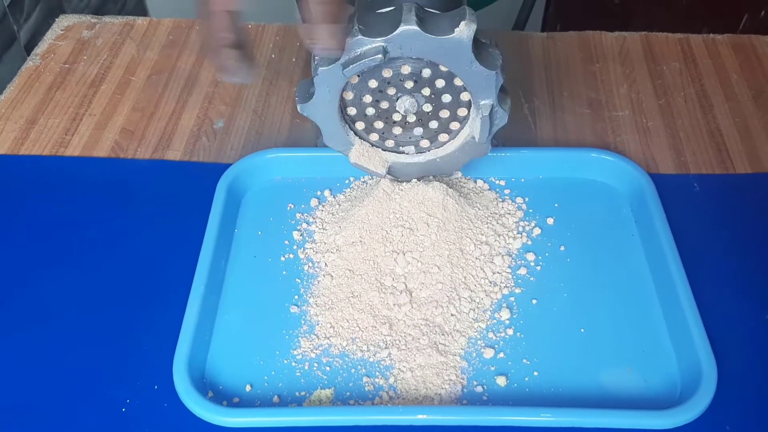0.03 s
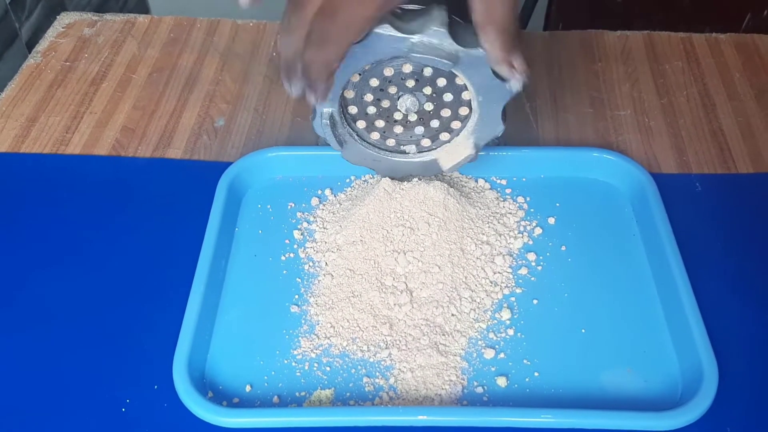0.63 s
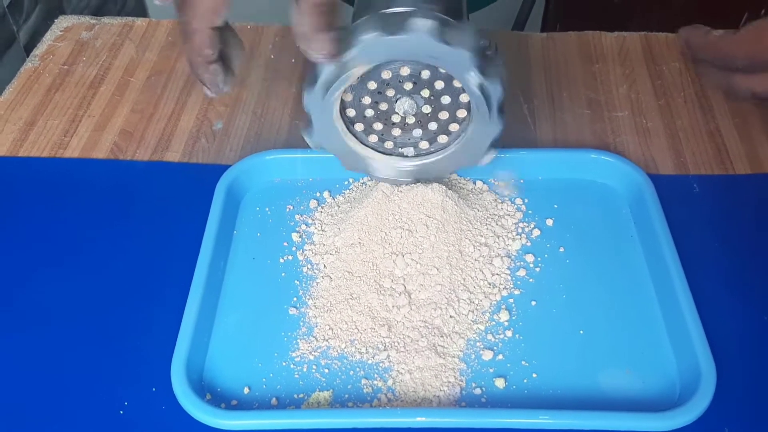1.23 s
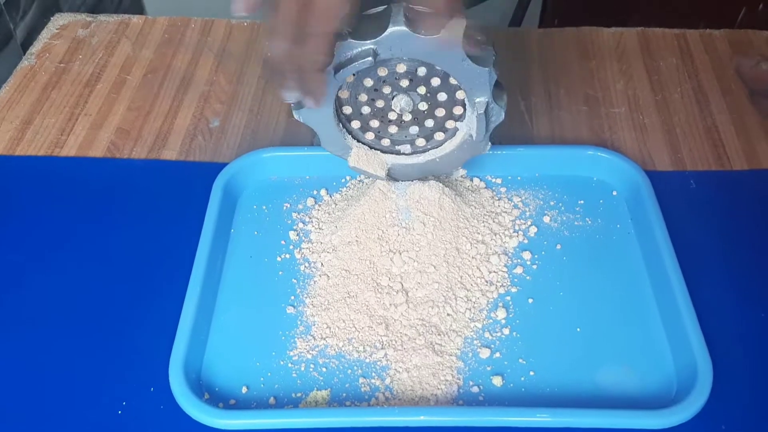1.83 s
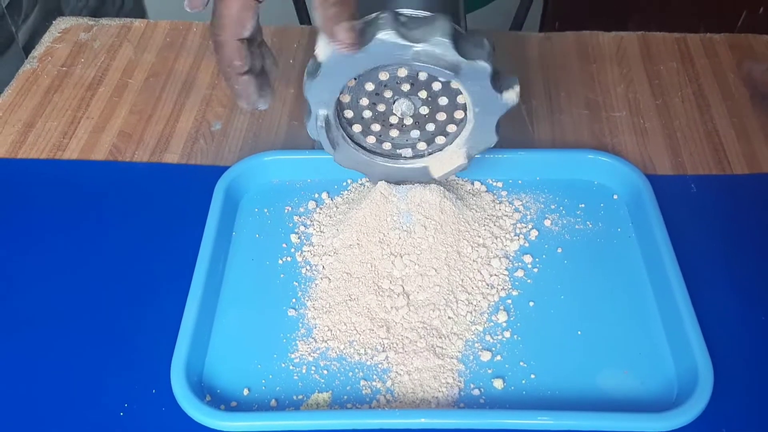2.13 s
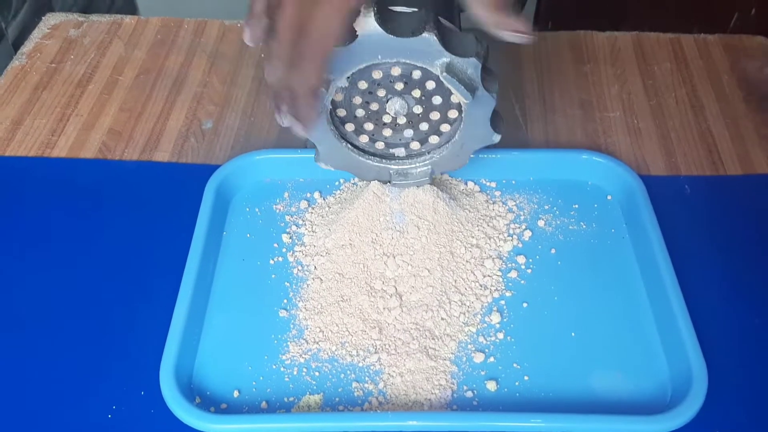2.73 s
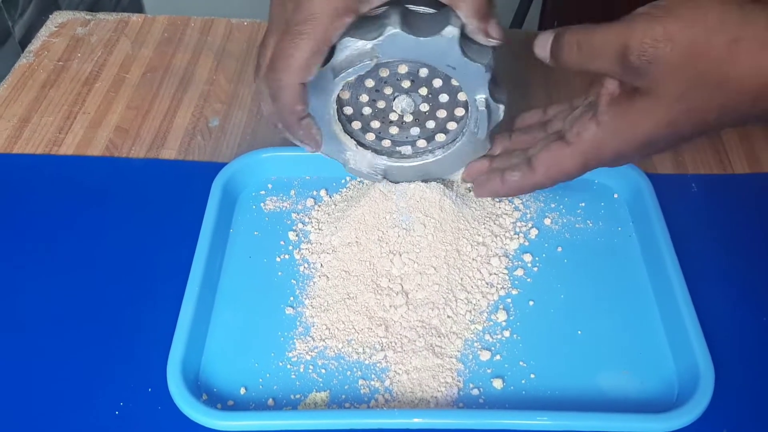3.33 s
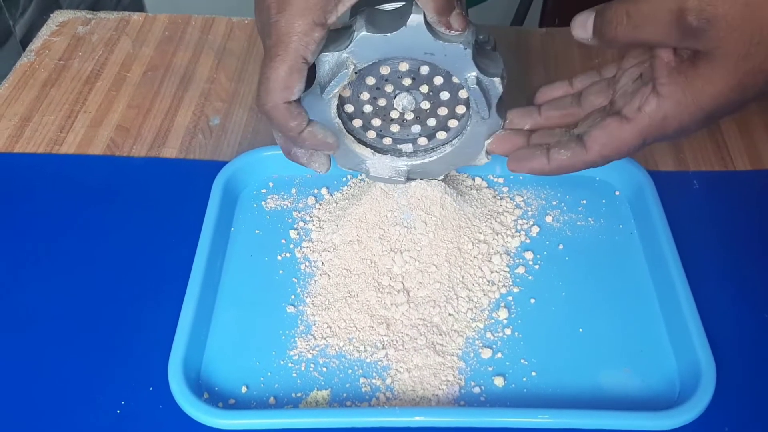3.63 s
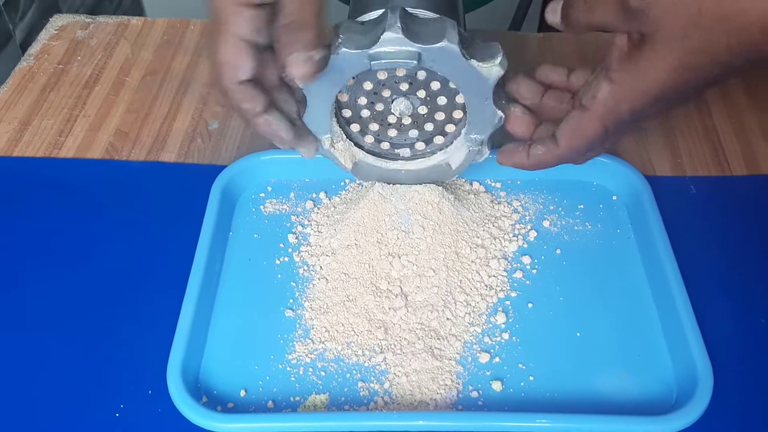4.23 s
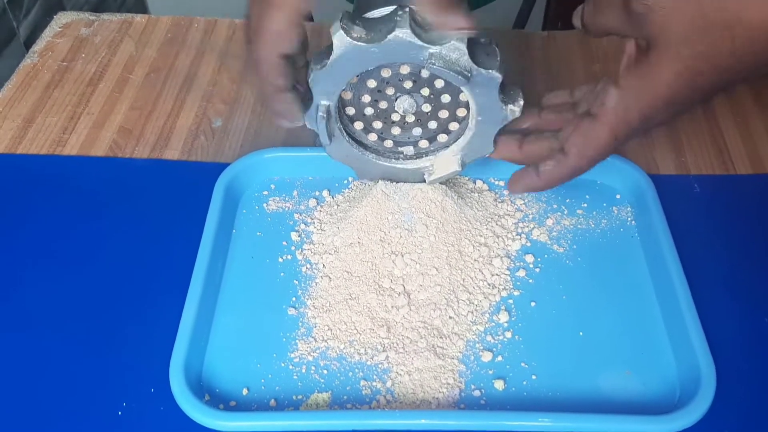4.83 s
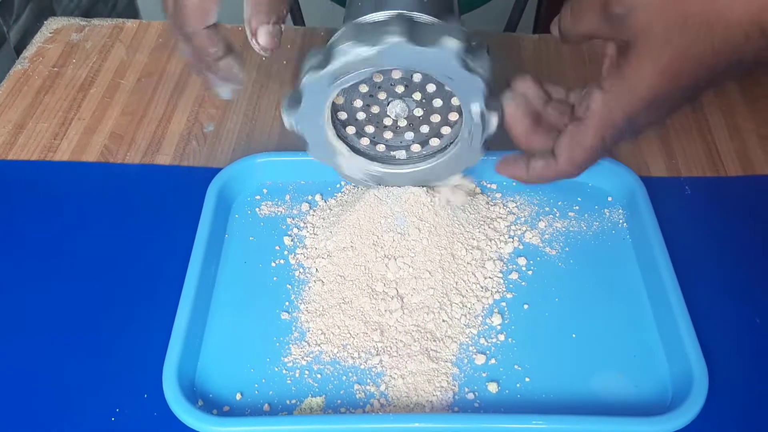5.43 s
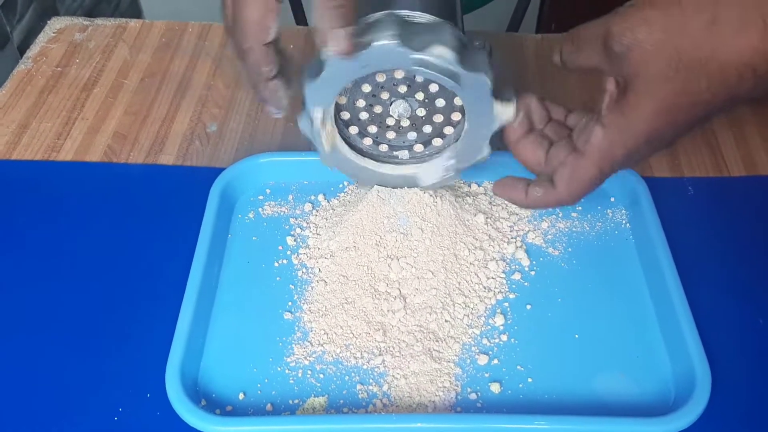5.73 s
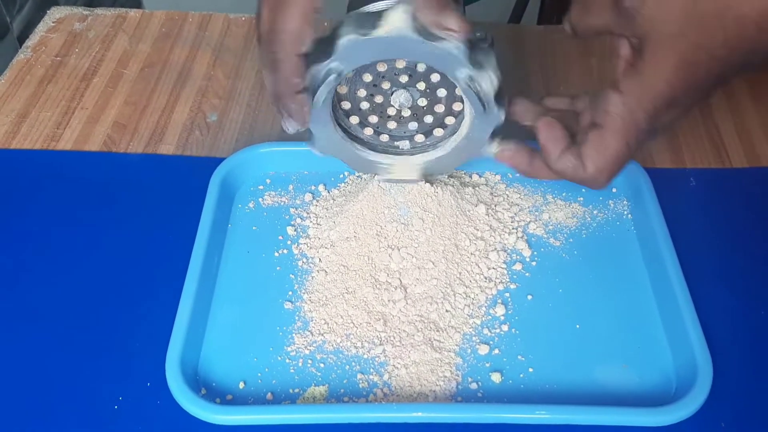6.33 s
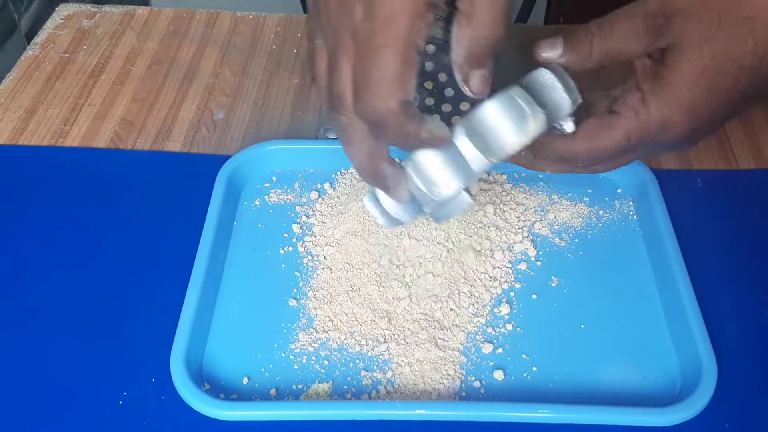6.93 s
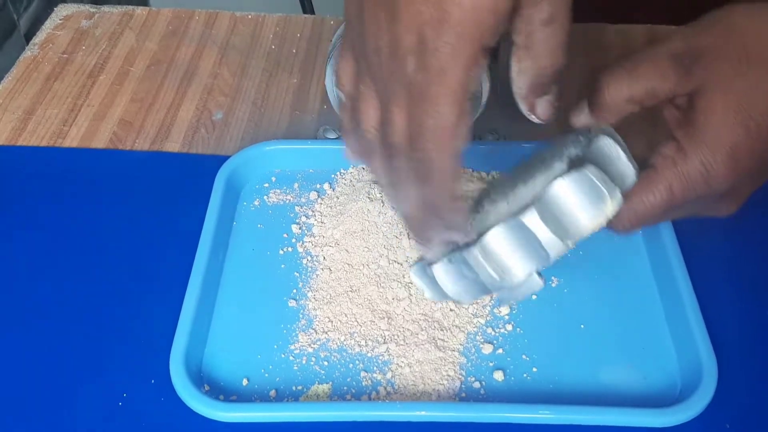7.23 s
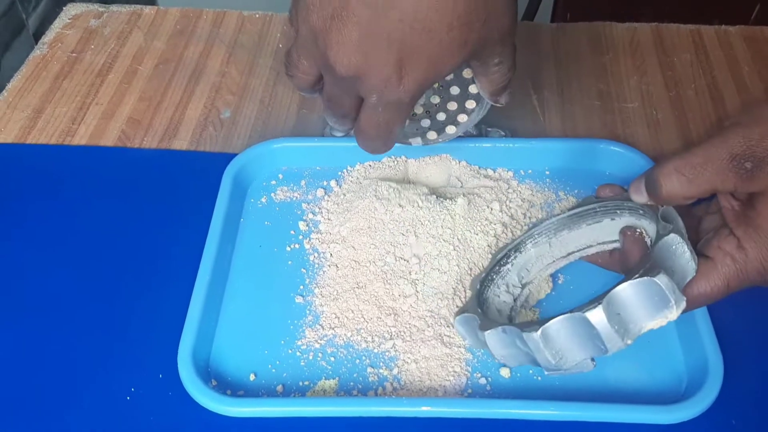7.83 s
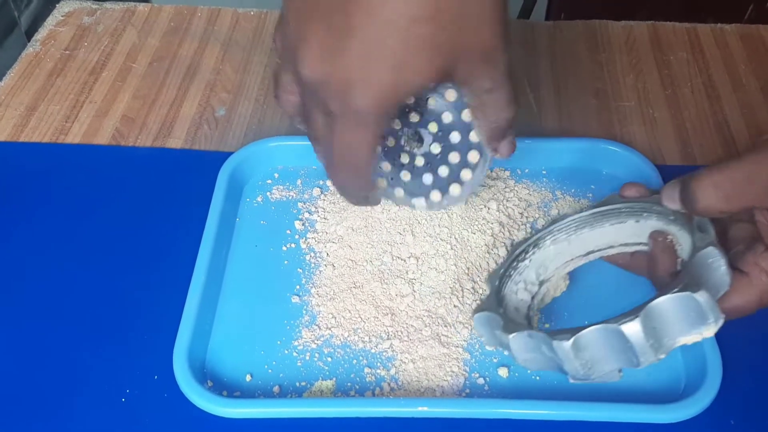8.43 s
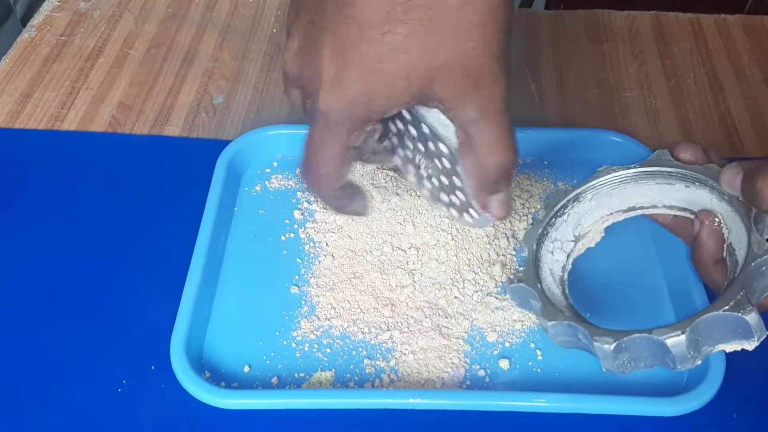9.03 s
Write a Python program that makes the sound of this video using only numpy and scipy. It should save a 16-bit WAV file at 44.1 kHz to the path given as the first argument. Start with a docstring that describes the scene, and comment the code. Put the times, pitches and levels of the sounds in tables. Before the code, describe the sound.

Short rasping turns and clacks of a metal ring on a dusty thread end in a ringing clink and a soft tray knock.

```python
"""Dry scrapes come in short strokes as a hand unscrews a cast metal ring from a grinder: the dusty
thread rasps, judders and squeaks, and the ring knocks in its play. It slips off the last thread with
a bright clink and sings as it rubs over the rim; soft knocks follow at a plastic tray.
Friction is a stream of tiny slips and each knock a push with chatter, both coloured by resonances;
the freed ring is a set of decaying modes. A small hard room answers, over a low rumble."""
import sys
import numpy as np
from scipy import signal
from scipy.fft import rfft, irfft, next_fast_len
from scipy.io import wavfile
from scipy.ndimage import map_coordinates

SR = 44100
rng = np.random.default_rng(int(sys.argv[2]) if len(sys.argv) > 2 else 0)


def pcm_store(signal):
    """Save signal as 16-bit PCM."""
    levels = np.round(np.clip(np.atleast_2d(signal), -1, 1) * 32767)
    wavfile.write(sys.argv[1], SR, levels.astype(np.int16).T)


N = 401310

# Turns of the hand. Each row: start and end in seconds, relative rasp level in dB,
# judder in dB against the rasp, fraction of the stroke at which it is fastest.
TURNS = [(-.1, 0.07, -37.5, 5.5, 0.24), (0.237, 0.493, -41, 3, 0.34), (0.69, 0.935, -37.5, -0.5, 0.58),
         (1.159, 1.42, -38.5, 2, 0.26), (1.548, 1.815, -45.5, 4, 0.3), (1.985, 2.216, -40, 7, 0.63),
         (2.429, 2.722, -45.5, 2, 0.32), (2.893, 3.089, -42, 2.5, .45), (3.38, 3.627, -54, 12, 0.29),
         (4.023, 4.191, -37, 1, 0.64), (4.468, 4.632, -34, 0.5, 0.46), (4.901, 5.048, -35, -1.5, 0.41),
         (5.347, 5.488, -34.5, 2, .4), (5.673, 5.827, -38, 4, 0.7), (6.026, 6.131, -33, 8, 0.37),
         (6.385, 6.475, -40, 9.5, 0.53), (6.5, 6.666, -46, 10, .5), (6.774, 6.894, -57, 12, .5)]
def thread(hiss_db=-6):
    """Each stroke speeds up and stops: the thread rasps and judders, and hisses most when fastest."""
    start, end, db, judder_db, fastest = np.transpose(TURNS)
    rasp = strokes(zip(start, end, db, fastest), steepness=1.45)
    hiss = strokes(zip(start, end, db + hiss_db, fastest), steepness=1.7)
    judder = strokes(zip(start, end, db + judder_db, fastest), steepness=1.0)
    return scraping(rasp, hiss, judder)


# Tone of the coarse slips, the powder and the judder. Each row: frequency in Hz, relative level in dB.
RASP_EQ = [(60, -28), (300, -11), (750, 9), (1300, -14.5), (2200, -2), (3000, -4), (3800, -11), (6500, -15),
           (8300, -25), (15500, -29)]
POWDER_EQ = [(1500, -29), (3500, -2.5), (5000, 0.5), (6800, 2), (8300, -5), (11000, -2.5), (13000, -5),
             (15500, -13.5)]
JUDDER_EQ = [(30, -15.5), (90, -8.5), (200, -5), (450, -0.5), (750, -1.5), (1200, -7.5), (2200, -23.5),
             (4000, -26), (12000, -49)]
# Resonances of the grinder on its table, and of the ring while the thread damps it.
# Each row: frequency in Hz, width in Hz, boost in dB.
BODY_MODES = [(97.5, 5.9, 16), (162, 8.9, 7), (258, 20, 9), (389, 30, 7.5), (541, 62, 6.5), (637, 27, 4.5),
              (856, 47, 4.5), (989, 42, 6), (1880, 520, 5), (2320, 930, 5.5), (3108, 520, 6)]
SEATED_MODES = [(4990, 110, 9), (5394, 90, 8.5), (7150, 470, 4), (9100, 62, 3), (11300, 150, 2.5),
                (12750, 260, 9)]
def scraping(rasp, hiss, judder):
    """Dusty metal on metal: coarse slips, fine powder and slow judder, each under its own envelope."""
    slips = amp(2.48 + 2.1 * wobble(80)) * rasp * grains(rate=2400, spread_db=3.0)
    powder = amp(-1.8 + 1.7 * wobble(60)) * hiss * grains(rate=5000, spread_db=3.0)
    jolts = amp(-1.46 + 2.0 * wobble(45)) * judder * grains(rate=900, spread_db=-0.5)
    return (coloured(slips, RASP_EQ, BODY_MODES) + coloured(powder, POWDER_EQ, SEATED_MODES)
            + coloured(jolts, JUDDER_EQ, BODY_MODES))


# The ring hits its thread. Each row: start in seconds, relative level in dB, then against that level
# the thud in dB and the hard edge in dB, clang pitch in Hz, clang offset in dB.
KNOCKS = [(.252, -15, -2, -23, 2650, -9.5), (.862, -27.5, 1, -22.5, 2180, -8),
          (1.17, -18.5, 1.5, -25, 1720, -6), (1.591, -17, 0.5, -14, 2690, -3),
          (1.608, -19, -4, -31, 2000, -4), (1.652, -24.5, -7, -23.5, 1950, -5),
          (1.997, -9, -5, -18.5, 2620, -11), (2.529, -32, -7, -18.5, 2300, -10.5),
          (2.63, -33.5, 3.5, -16.5, 2100, 14), (2.93, -32.5, 4, -21, 2200, -15),
          (3.003, -20.5, -0.5, -25.5, 1860, -7), (3.073, -14, -6, -28, 1890, -2.5),
          (3.106, -20.5, 0, -22, 1890, 0), (3.342, -35.5, 9.5, -28, 1900, -21),
          (4.286, -26.5, 4.5, -20, 1840, -2.5), (4.541, -18.5, 2.5, -15, 2170, -9),
          (4.611, -17, 0.5, -21.5, 2200, -9), (4.944, -21, 1, -20, 2400, -8),
          (5.311, -30, 1.5, -22.5, 2120, -8.5), (5.356, -14.5, -9, -21, 2470, -4),
          (5.385, -17.5, -3, -24, 2000, -7), (5.399, -15, -4.5, -27, 1850, -1),
          (6.039, -15, -5.5, -24, 2230, -8.5), (6.07, -13, 1, -22, 1880, -6),
          (6.084, -17, 0, -20.5, 2310, -6), (6.186, -26, 1.5, -26.5, 1900, -9.5),
          (6.207, -18, -5.5, -21.5, 3050, -4.5), (6.297, -13, -3, -27.5, 1860, -6),
          (6.31, -23.5, 1.5, -24.5, 2065, -9), (6.389, -11.5, -9, -13.5, 2240, -7.5),
          (6.421, -10, -1, -23.5, 1926, -12), (6.49, -10.5, -7, -11.5, 3130, -2.5),
          (6.793, -28, -1, -25, 1950, 1)]
# Tone of a knock's four layers. Each row: frequency in Hz, relative level in dB.
THUD_EQ = [(30, -20.5), (90, -11), (250, -4.5), (340, 2.5), (520, -1), (800, 0), (1300, -16), (3000, -45),
           (8000, -69.5)]
REBOUND_EQ = [(40, -19), (100, -4), (280, -3.5), (450, -7), (900, -24.5), (3000, -60)]
CLACK_EQ = [(200, -28.5), (800, 10.5), (1300, -1), (1750, -3.5), (2500, -4), (3200, -10), (4500, -24),
            (9000, -40)]
EDGE_EQ = [(1500, -43), (4200, 7), (6500, 1), (8500, -11), (12000, -10.5), (15500, -26.5)]
def knocks(rebound_s=0.014, rebound_db=-4.5):
    """The ring drops across its play: a hard-edged clack, a thud, and the grinder rocking back."""
    s, db, thud_db, edge_db, _, _ = np.transpose(KNOCKS)
    thud = coloured(blows(s, db + thud_db, chatter=1.4, t60=0.1), THUD_EQ, BODY_MODES)
    rocking = blows(s + rebound_s, db + thud_db + rebound_db, chatter=2.2, t60=0.083)
    rebound = coloured(rocking, REBOUND_EQ, BODY_MODES)
    clack = coloured(blows(s, db, chatter=1.8, t60=0.031), CLACK_EQ, BODY_MODES)
    edge = coloured(blows(s, db + edge_db, chatter=1.7, t60=0.029), EDGE_EQ, SEATED_MODES)
    return amp(21) * (thud + rebound) + amp(17.5) * clack + amp(21.5) * edge


def clangs(decay_s=0.0065):
    """Each knock also sounds a very short metal note, pitched by where the ring meets the barrel."""
    out, t = np.zeros(N), np.arange(SR // 20) / SR
    for s, db, _, _, hz, clang_db in KNOCKS:
        note = t * amp(-60 * t / decay_s) * np.sin(2 * np.pi * hz * t)
        add(out, s, amp(db + clang_db) * note / np.linalg.norm(note))
    return amp(16.5) * out


# The ring's modes. Each row: frequency in Hz, relative levels in dB when struck and when rubbed,
# undamped t60 in seconds, left over right in dB.
RING_MODES = [(1919, -20.5, -3.5, 1.2, -3), (1940, -14, -1, 1.2, 0.5), (2010, -23.5, -6, 1.5, 4.5),
              (3260, -25, -14, .6, -2), (3320, -17.5, -23, 0.28, -4.5), (4940, -19.5, -12, 1, -2),
              (5060, -7, -13.5, .03, -2), (5327, 0, -0.5, 0.8, -6.5), (5250, -13, -5, .9, 4),
              (8581, -32.5, -23, 0.3, -1), (8856, -20.5, -27, 0.17, -6), (9862, -25.5, -20, 0.12, -6),
              (11130, -25, -27.5, 0.27, -5), (12540, -35, -21, .3, -6.5), (12710, -27.5, -17.5, .4, -6),
              (15140, -34.5, -30, 0.202, -8.5)]
# Strikes on the loose ring. Each row: start in seconds, relative level in dB.
CLINKS = [(6.49, -3), (6.577, -21), (6.792, -40)]
# The ring drags over the barrel's rim. Each row: start and end in seconds, relative level in dB.
RIM_RUBS = [(6.51, 6.66, -34.5), (6.62, 6.79, -52), (6.74, 6.92, -47.5)]
def ring(held_t60=0.38, attack_s=0.00036, choke_db=-9, release_s=6.86, release_db=-66.5):
    """The freed ring sounds its modes: choked by the barrel after a strike, singing on when rubbed."""
    t = np.arange(SR) / SR
    hz, struck_db, rubbed_db, t60, pan_db = np.transpose(RING_MODES)[:, :, None]
    # each side hears a mode at its own phase
    phase = rng.uniform(0, 2 * np.pi, hz.shape) + np.array([-.4, .4])[:, None, None]
    envelope = amp(-60 * t / t60) * (1 - np.exp(-t / attack_s))
    modes = panned(pan_db) * np.sin(2 * np.pi * hz * t + phase) * envelope
    choke = np.interp(t, [.036, .046], [0, choke_db])
    strike = np.sum(modes * amp(struck_db - 60 * t / held_t60 + choke), axis=1)
    clinks = np.zeros((2, N))
    for s, db in CLINKS:
        add(clinks, s, amp(db - 6.0) * strike)
    free = np.sum(modes * amp(rubbed_db), axis=1)  # clear of the barrel, it rings undamped
    add(clinks, release_s, amp(release_db) * free)
    song = np.sum(modes * amp(rubbed_db - 60 * t / 0.15), axis=1)  # the fingers damp it
    friction = strokes(RIM_RUBS, steepness=1.0) * grains(rate=1300, spread_db=0.5)
    rubbed = convolved(friction, song)[:, :N]
    # the ring tilts in the hand, so its level wavers on each side
    tilting = np.interp(np.arange(N) / SR, [6.52, 6.6], [0, 1])
    return (clinks + rubbed) * amp(4.5 * tilting * np.array([wobble(95), wobble(85)]))


# High squeaks, and groans that sink as the ring works loose.
# Each row: start and end in seconds, pitch in Hz, level in dB.
SQUEAKS = [(.39, .47, 5390, -54), (.77, .84, 5260, -44), (.785, .89, 4950, -44.5), (1.2, 1.29, 5460, -50),
           (1.215, 1.275, 4960, -48), (2.09, 2.18, 5390, -44.5), (2.135, 2.19, 2280, -38),
           (2.575, 2.615, 5340, -47), (4.525, 4.58, 4960, -39), (4.53, 4.605, 5380, -39.5),
           (4.94, 5.03, 5410, -43.5), (4.95, 5.02, 4980, -45.5), (5.72, 5.8, 5100, -47),
           (6.505, 6.535, 2250, -32), (6.55, 6.66, 4855, -41.5), (6.59, 6.65, 12700, -40),
           (6.6, 6.64, 5330, -33.5), (6.8, 6.89, 4880, -49)]
GROANS = [(.37, .52, 780, -37), (.72, .95, 849, -42), (1.26, 1.42, 850, -41), (2.05, 2.22, 792, -37),
          (2.44, 2.56, 775, -37.5), (2.6, 2.69, 697, -38.5), (4.12, 4.2, 666, -40), (4.6, 4.72, 584, -35.5),
          (4.73, 4.87, 587, -42), (4.93, 5.02, 640, -31), (5.04, 5.11, 625, -35.5), (5.74, 5.83, 641, -35)]
def squeals():
    """Metal slides on metal: the ring squeaks when it moves fast and groans as it slows."""
    squeaks = friction_notes(SQUEAKS, width_hz=200, steepness=2.3, rough=0.43)
    groans = friction_notes(GROANS, width_hz=93, steepness=0.85, rough=0.65)
    return squeaks + groans


def friction_notes(rows, width_hz, steepness, rough):
    """Friction locks loosely onto a resonance, giving short notes that swell and waver."""
    out = np.zeros(N)
    waver = 1 - rough + rough * (wobble(width_hz) + 1j * wobble(width_hz))
    waver /= np.sqrt(np.mean(np.abs(waver) ** 2) / 2)
    for start, end, hz, db in rows:
        span = np.arange(round(start * SR), round(end * SR))
        swell = np.abs(np.sin(np.linspace(0, np.pi, len(span)))) ** (steepness / 2)
        out[span] += amp(db) * swell * np.real(waver[span] * np.exp(2j * np.pi * hz * span / SR))
    return out


# The fingers take a new hold. Each row: start and end in seconds, relative judder level in dB,
# brushing in dB against the judder.
GRIPS = [(0.921, 1.225, -55, -6.5), (3.087, 3.508, -46, -13.5), (3.53, 3.892, -46, -25.5),
         (4.189, 4.484, -56.5, -10.5), (4.575, 4.93, -49, -11.5), (4.995, 5.12, -41.5, -20.5),
         (5.42, 5.582, -36, -15), (5.958, 6.167, -35.5, -13.5), (6.106, 6.423, -49.5, -26),
         (6.636, 6.996, -44, -28)]
def grips(rasp_db=-18.5):
    """A shifting grip rocks the ring and brushes a little powder; the thread hardly moves."""
    start, end, db, brush_db = np.transpose(GRIPS)
    rocking = strokes(zip(start, end, db), steepness=2.7)
    brushing = strokes(zip(start, end, db + brush_db), steepness=2.2)
    return scraping(amp(rasp_db) * rocking, brushing, rocking)


def fingers(grit_db=-17.5):
    """Dusty fingers brush the ring until it is off, and powder grates between ring and rim."""
    touch_db = np.interp(np.arange(N) / SR, [6.9, 7.1], [-71, -110])
    grit = amp(grit_db) * strokes(RIM_RUBS, steepness=1.8) * grains(rate=1000, spread_db=2.5)
    touch = amp(touch_db + 2.5 * wobble(4.6)) * grains(rate=5000, spread_db=1.5)
    return coloured(touch + grit, POWDER_EQ)


# Small dry ticks. Each row: start in seconds, relative level in dB.
TICKS = [(3.562, -22.5), (3.769, -24.5), (4.84, -33.5), (6.557, -13.5), (6.577, -21), (7.375, -56)]
# Their tone. Each row: frequency in Hz, relative level in dB.
TICK_EQ = [(500, -23.5), (2500, 2.5), (4500, -3.5), (7000, -2), (9000, -18), (15000, -31)]
def ticks():
    """Grit and fingernails tick, hardly stirring the metal."""
    s, db = np.transpose(TICKS)
    return amp(10.5) * coloured(blows(s, db, chatter=0.84, t60=0.021), TICK_EQ)


# The table's low modes. Each row: frequency in Hz, level in dB, t60 in seconds.
TABLE_MODES = [(52.33, -38.5, 2.9), (160.5, -23, 0.53)]
def shudder(attack_s=0.021):
    """Relieved of the ring at the first clink, the grinder sways on its table for a second."""
    out, t = np.zeros(N), np.arange(SR) / SR
    sway = sum(amp(db - 60 * t / t60) * np.sin(2 * np.pi * hz * t) for hz, db, t60 in TABLE_MODES)
    add(out, CLINKS[0][0], sway * (1 - np.exp(-t / attack_s)))
    return out


# Soft knocks at the tray. Each row: start in seconds, relative level in dB.
TRAY_KNOCKS = [(7.72, -51.5), (8.086, -45.5), (8.092, -39.5), (8.096, -31), (8.113, -37.5)]
# Their resonances. Each row: frequency in Hz, width in Hz, boost in dB.
TRAY_MODES = [(393, 54, 7), (517, 60, 9), (1890, 100, 12), (2680, 90, 3), (6340, 178, 9.5), (7840, 400, 12)]
# Tone of those knocks, and of fingertips on powder. Each row: frequency in Hz, relative level in dB.
TRAY_EQ = [(100, -11), (400, -0.5), (750, -5.5), (1900, -13.5), (3000, -18), (3700, -41), (5000, -33),
           (6400, -28), (8000, -29.5), (9000, -47.5), (15000, -48)]
BRUSH_EQ = [(1000, -9), (3000, -9.5), (5500, -5), (7300, 2), (8500, -10.5), (10000, -6.5), (13000, -10),
            (15500, -20)]
# Pulls on the grinder's perforated plate. Each row: start and end in seconds, level in dB.
PLATE_SLIDES = [(7.22, 7.65, -75.5), (8.06, 8.35, -69), (8.44, 8.7, -67.5)]
def tray(resting_db=-81):
    """Cushioned knocks at the tray; fingertips rest on the dusty plate and faintly brush it out."""
    s, db = np.transpose(TRAY_KNOCKS)
    knock = amp(26.0) * coloured(blows(s, db, chatter=0.89, t60=0.055), TRAY_EQ, TRAY_MODES)
    brush = np.hypot(amp(resting_db), strokes(PLATE_SLIDES, steepness=3.0))
    tail = amp(-13.0) * room_echoes(knock, build_s=0.011)[0]  # these knocks linger in the room
    return knock + tail + coloured(brush * grains(rate=2100, spread_db=0.5), BRUSH_EQ)


def near_reflections(x, every_s=0.16, t60=0.028, build_s=0.00034):
    """Sound bounces off table, tray and hands; the pattern keeps changing as ring and hands move."""
    hop, t = round(every_s * SR), np.arange(SR // 16) / SR
    window = np.sin(np.pi * np.arange(2 * hop) / (2 * hop))
    fade = amp(-60 * t / t60) * (1 - np.exp(-(t / build_s) ** 2))
    padded, out = np.pad(x, (hop, 2 * hop)), np.zeros((2, N + hop))
    for start in range(0, N + hop, hop):
        paths = evened(noise_pair(len(t)) * fade)
        piece = padded[start:start + 2 * hop] * window
        add(out, start / SR, convolved(piece, paths))
    return out[:, hop:]


# Reverb time of the small hard room. Each row: frequency in Hz, t60 in seconds.
ROOM_DECAY = [(100, 0.38), (700, 1), (2000, 0.66), (5000, 0.55), (12000, 0.37)]
def room_echoes(x, build_s):
    """The room adds a diffuse stereo tail in which each frequency dies at its own speed."""
    hz, t, spectra = signal.stft(noise_pair(SR), SR, nperseg=256)
    decay = amp(-60 * t / along(ROOM_DECAY, hz)[:, None])
    tail = signal.istft(spectra * decay, SR, nperseg=256)[1]
    tail *= 1 - np.exp(-(np.arange(tail.shape[1]) / SR / build_s) ** 2)
    return convolved(x, tail)[:, :N]


# The background's level over time. Each row: time in seconds, level in dB.
RUMBLE_LEVELS = [(0, -45.5), (1.4, -41.5), (3.9, -45.5), (4.9, -41), (7.7, -45), (8.6, -39.5)]
# Its tone. Each row: frequency in Hz, relative level in dB.
RUMBLE_EQ = [(15, -67), (25, -43.5), (36, -21), (59, -12), (81, -7), (135, -4.5), (196, -12.5), (219, -12),
             (293, -18.5), (363, -30), (637, -35.5), (691, -39), (1420, -53), (9270, -68), (15000, -77.5)]
def rumble():
    """A low, heaving background with two droning resonances and a trace of hiss."""
    drones = [(98.3, 13, 7.5), (143, 14, 1.8)]
    air = np.array([coloured(side, RUMBLE_EQ, drones) for side in noise_pair(N)])
    level_db = np.interp(np.arange(N) / SR, *np.transpose(RUMBLE_LEVELS))
    return amp(level_db + 1.6 * wobble(12.0)) * unit(air)


# How alike left and right are. Each row: frequency in Hz, coherence from 0 to 1.
COHERENCE = [(100, .93), (300, 0.96), (700, 0.41), (1400, 0.17), (4000, 0.026)]
def noise_pair(size):
    """Diffuse stereo noise: alike in the bass, unrelated in the treble."""
    def mid_side_gains(hz):
        angle = np.arccos(np.clip(along(COHERENCE, hz), -1, 1)) / 2
        return np.array([np.cos(angle), np.sin(angle)])
    mid, side = filtered(rng.standard_normal((2, size)), mid_side_gains)
    return np.array([mid + side, mid - side])


def strokes(rows, steepness):
    """Envelope of hand movements, fastest midway by default; power follows speed ** steepness."""
    power = np.zeros(N)
    for start, end, db, *share in rows:
        span = np.arange(max(round(start * SR), 0), round(end * SR))
        fastest = start + (end - start) * (share[0] if share else .5)
        speed = np.abs(np.sin(np.pi * np.interp(span / SR, [start, fastest, end], [0, .5, 1])))
        power[span] += amp(db) ** 2 * speed ** steepness
    return np.sqrt(power)


def grains(rate, spread_db):
    """Tiny slips of scattered size at random moments, about rate a second, rms 1."""
    slips = (rng.random(N) < rate / SR) * rng.standard_normal(N)
    return unit(slips * amp(spread_db * np.clip(rng.standard_normal(N), -2, 2)))


def blows(times, levels_db, chatter, t60):
    """Contact forces: a sharp push, then a dying chatter of the loose parts."""
    force, t = np.zeros(N), np.arange(SR // 5) / SR
    for s, db in zip(times, levels_db):
        rattle = rng.standard_normal(len(t)) * amp(-60 * t / t60)
        push = chatter * rattle / np.linalg.norm(rattle)
        push[0] += 1
        push = evened(push)
        add(force, s, amp(db) * push / np.linalg.norm(push))
    return force


def evened(burst, depth=0.75):
    """Levels a noise burst's chance peaks and notches, so that it adds no pitch, and fades it out."""
    size, spectrum = burst.shape[-1], rfft(burst)
    levelled = irfft(spectrum / (np.abs(spectrum) + 1e-9) ** depth, size)
    return levelled * np.cos(np.linspace(0, np.pi / 2, size)) ** 2


def coloured(x, eq, resonances=(), size=16384):
    """x through a unit-energy filter: a broad EQ curve with (Hz, width in Hz, boost in dB) peaks."""
    hz = np.fft.rfftfreq(size, 1 / SR)
    peaks_db = sum(boost / (1 + (2 * (hz - f) / width) ** 2) for f, width, boost in resonances)
    cepstrum = irfft(np.log(amp(along(eq, hz) + peaks_db)))[:size // 2]
    cepstrum[1:] *= 2  # minimum phase: nothing rings ahead of the hit
    response = irfft(np.exp(rfft(cepstrum, size)))
    return signal.fftconvolve(x, response / np.linalg.norm(response))[:N]


def convolved(x, response):
    """Mono x through a stereo impulse response, scaled to unit energy on the left."""
    return signal.fftconvolve(x[None], response / np.linalg.norm(response[0]), axes=1)


def filtered(x, response):
    """x through a gain given as a function of frequency."""
    size = next_fast_len(x.shape[-1] + SR // 4)
    return irfft(rfft(x, size) * response(np.fft.rfftfreq(size, 1 / SR)), size)[..., :x.shape[-1]]


def wobble(rate):
    """A smooth random curve, rate knots a second."""
    return map_coordinates(rng.standard_normal(int(N * rate / SR) + 4), [np.arange(N) * rate / SR])


def along(points, hz):
    """(Hz, value) points read on a log axis."""
    freqs, values = np.transpose(points)
    return np.interp(np.log(hz + 1), np.log(freqs + 1), values)


def amp(db):
    """Decibels to gain."""
    return 10 ** (np.asarray(db) / 20)


def unit(x):
    """Scaled to rms 1."""
    return x / np.sqrt(np.mean(x ** 2) + 1e-20)


def panned(db):
    """Left and right gains for a level difference."""
    return amp(np.array([db, -db]) / 2)


def add(track, s, sound):
    """Mix a sound into a track at s seconds."""
    part = track[..., round(s * SR):][..., :sound.shape[-1]]
    part += sound[..., :part.shape[-1]]


# The stereo image. Each row: frequency in Hz, left over right in dB.
BALANCE = [(70, 12), (200, 2.5), (400, 3.5), (700, 6), (1300, 2.5), (2400, 0.5), (4400, -3.5),
           (15000, -5.5)]
def placement(hz, left_lag_s=0.00007):
    """Bass leans left and treble right; the left side is further away and hears it all later."""
    return panned(along(BALANCE, hz)) * np.exp(1j * np.pi * hz * left_lag_s * np.array([[-1], [1]]))


def scene():
    """Bass arrives directly; treble scatters off the table and tray, differently for each side."""
    handling = thread() + grips() + fingers() + knocks() + ticks() + tray() + shudder()
    ringing = ring()
    tones = squeals() + clangs()  # these stay close and stir the room less
    scatter = lambda hz: along([(200, 0.059), (700, 0.81), (1500, 0.7), (5000, 1.0)], hz)
    direct = filtered(handling + tones, lambda hz: np.sqrt(1 - scatter(hz) ** 2))
    near = filtered(near_reflections(handling + tones), scatter)
    room = amp(-7.5) * room_echoes(handling + amp(-7) * tones, build_s=0.003)
    room += amp(-13.5) * room_echoes(ringing.mean(0), build_s=0.009)
    return ringing + filtered(direct + near + room + rumble(), placement)


def record(dry, ceiling=0.93, fade_s=0.006, top_hz=15750):
    """Soft-clips the loudest peak, fades out at the very end and cuts the highest treble."""
    rounded = dry / (1 + (dry / ceiling) ** 8) ** (1 / 8)
    fade = np.sin(np.pi / 2 * np.minimum(np.arange(N)[::-1] / (fade_s * SR), 1)) ** 2
    return filtered(rounded * fade, lambda hz: hz < top_hz)


dry = scene()
out = record(dry)
pcm_store(out)
```